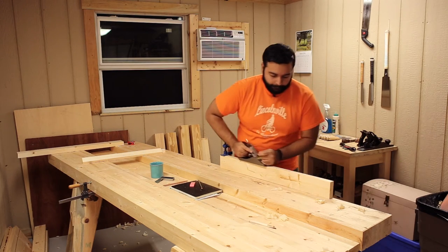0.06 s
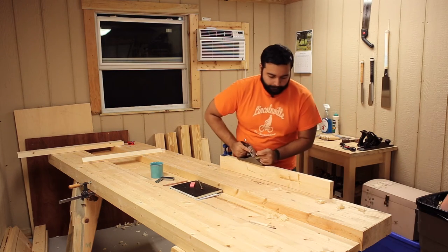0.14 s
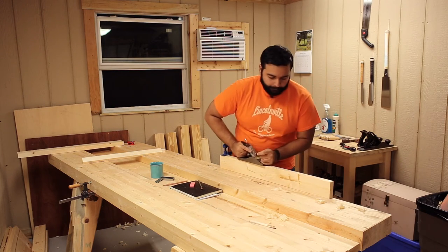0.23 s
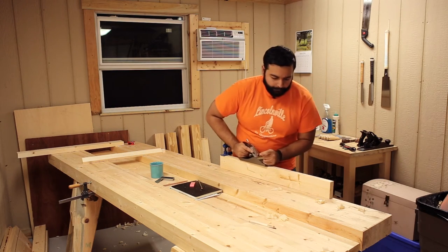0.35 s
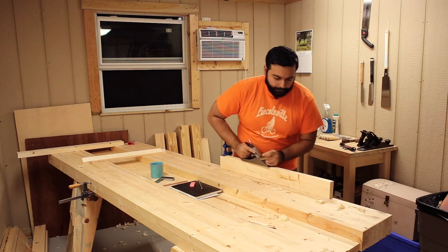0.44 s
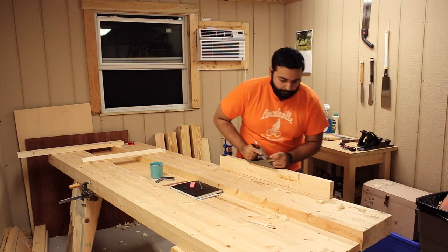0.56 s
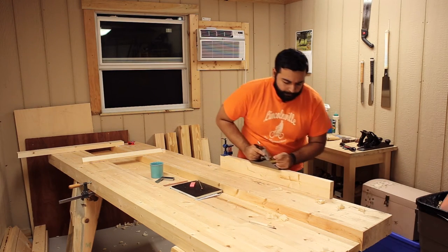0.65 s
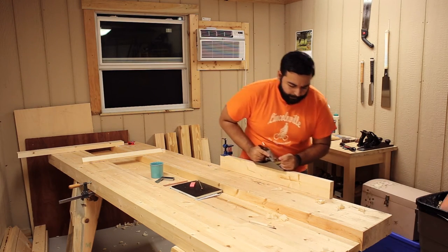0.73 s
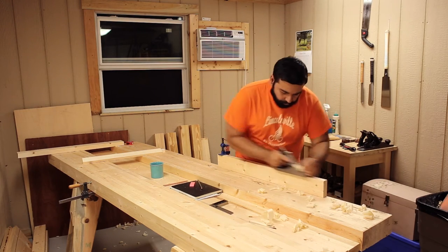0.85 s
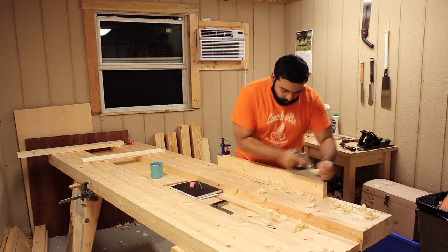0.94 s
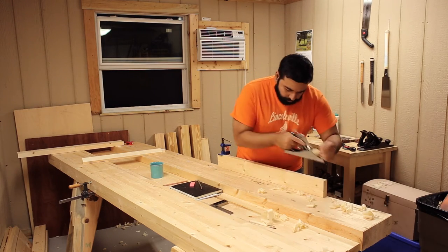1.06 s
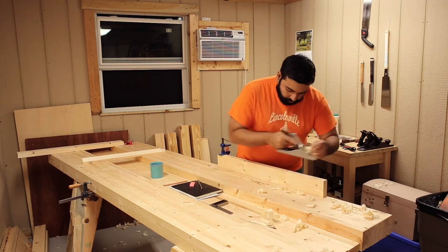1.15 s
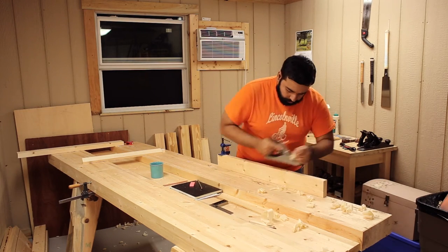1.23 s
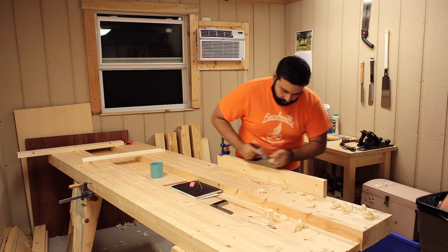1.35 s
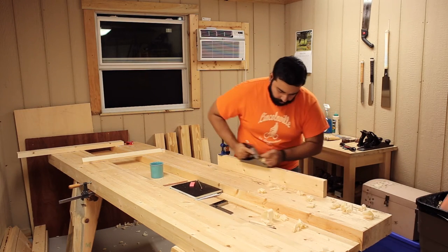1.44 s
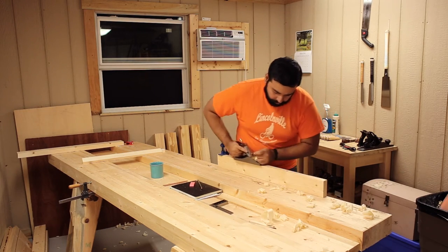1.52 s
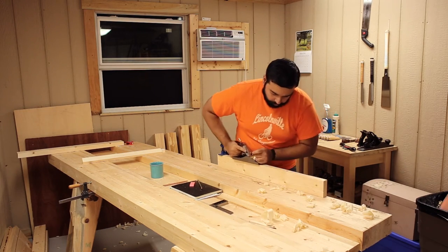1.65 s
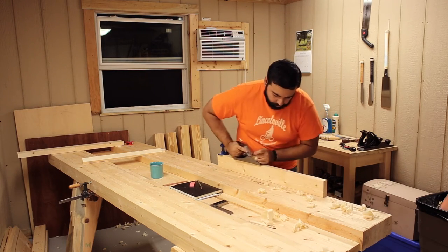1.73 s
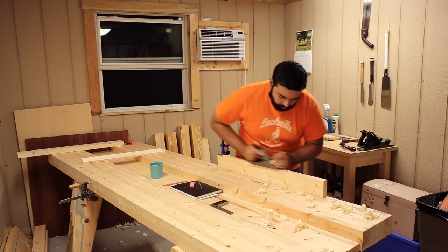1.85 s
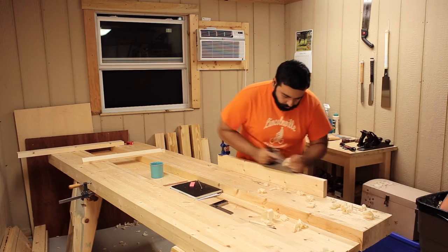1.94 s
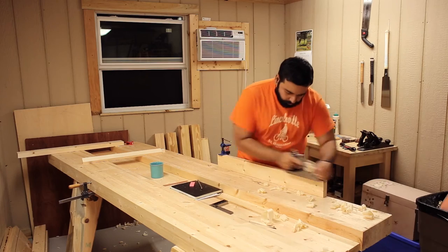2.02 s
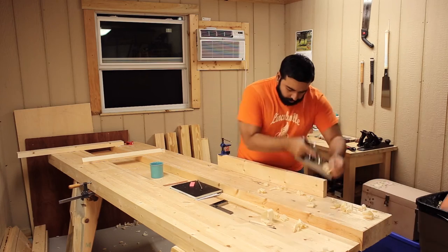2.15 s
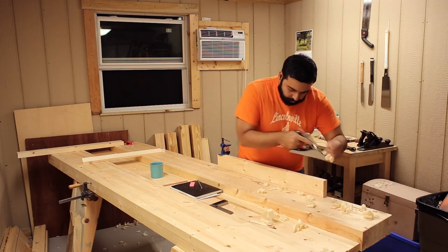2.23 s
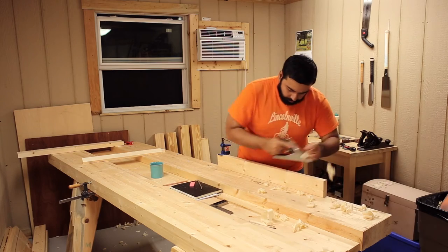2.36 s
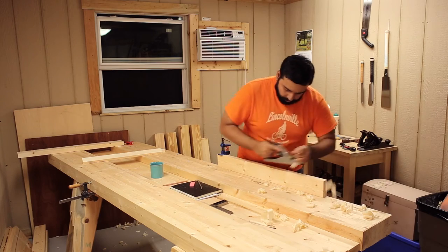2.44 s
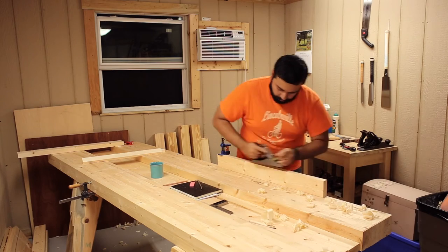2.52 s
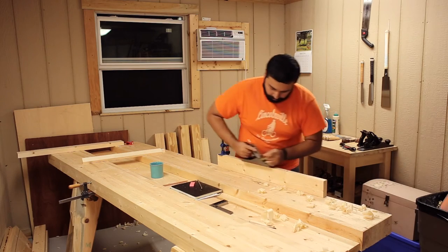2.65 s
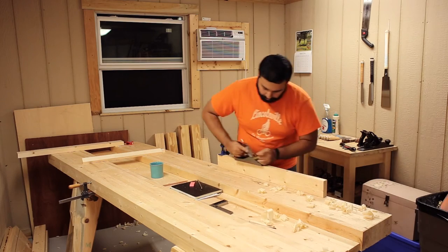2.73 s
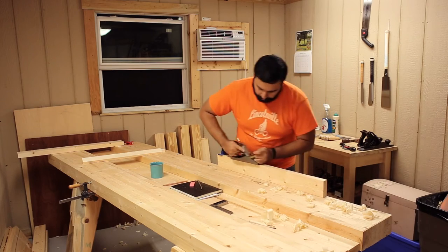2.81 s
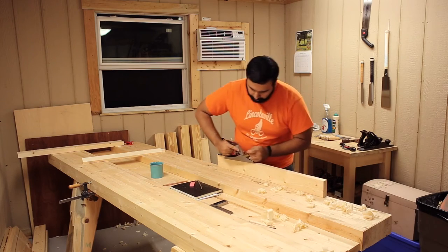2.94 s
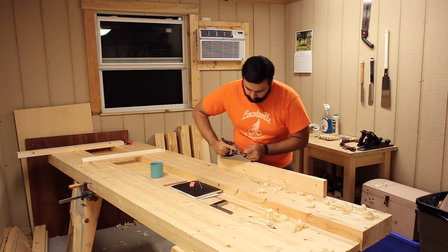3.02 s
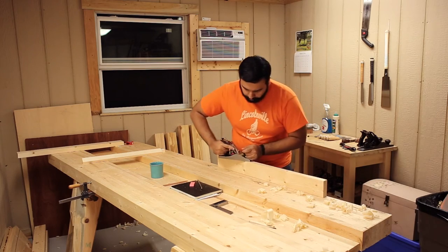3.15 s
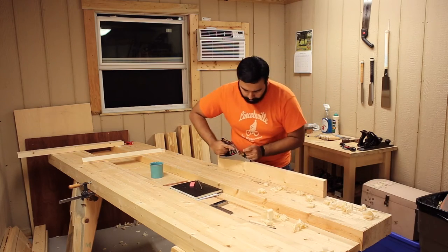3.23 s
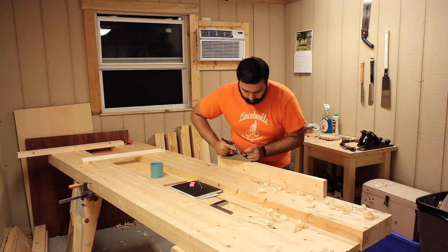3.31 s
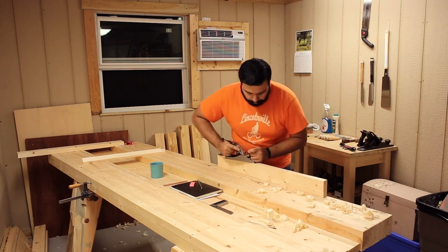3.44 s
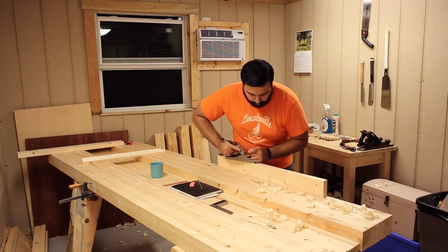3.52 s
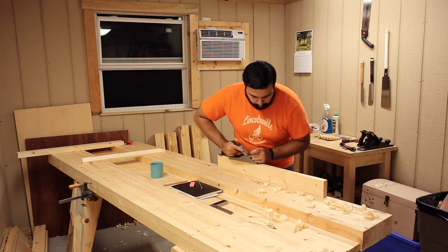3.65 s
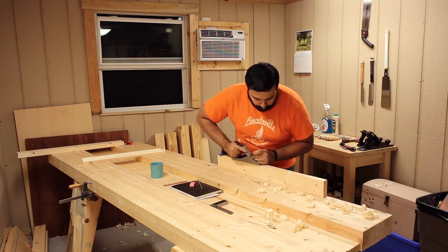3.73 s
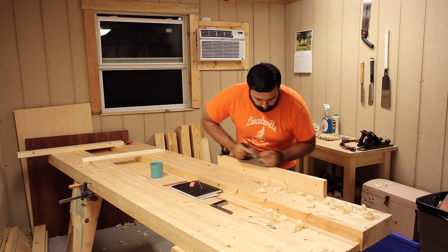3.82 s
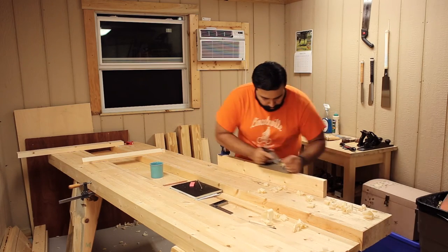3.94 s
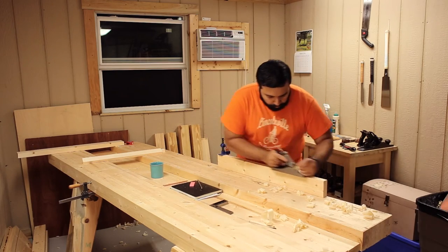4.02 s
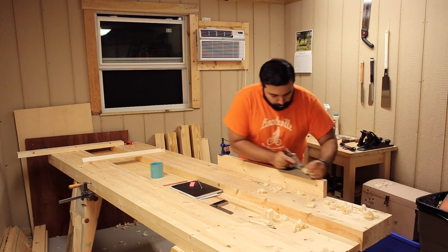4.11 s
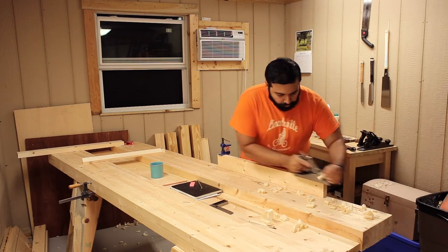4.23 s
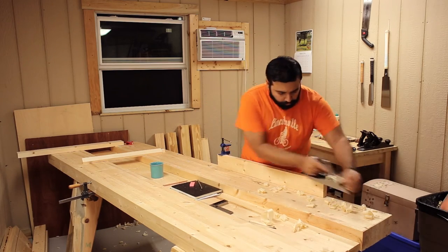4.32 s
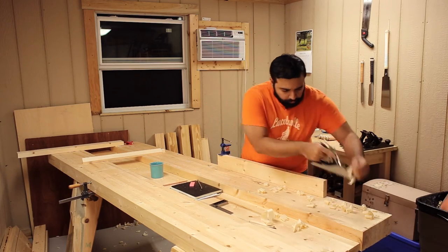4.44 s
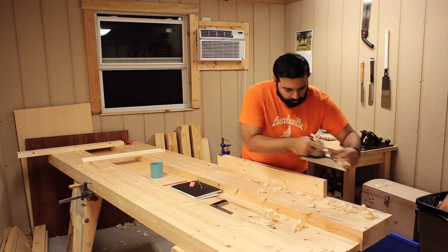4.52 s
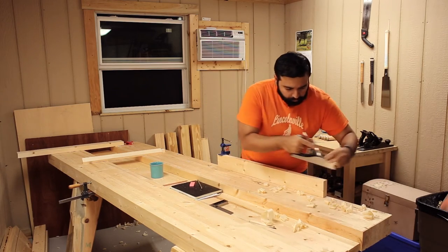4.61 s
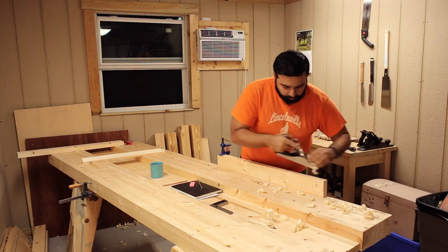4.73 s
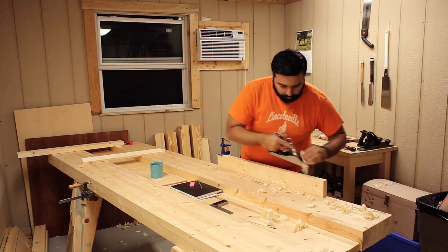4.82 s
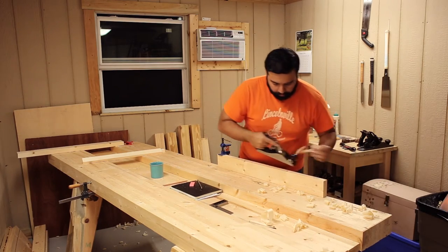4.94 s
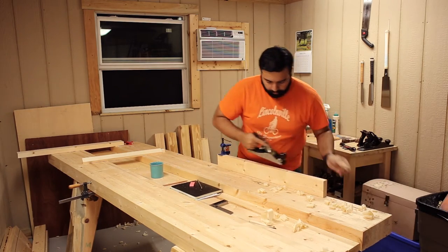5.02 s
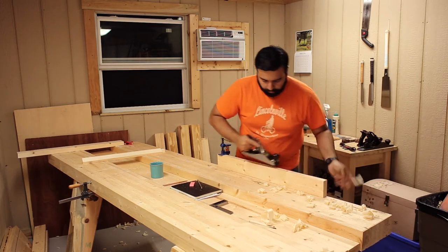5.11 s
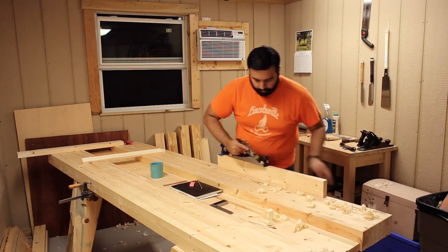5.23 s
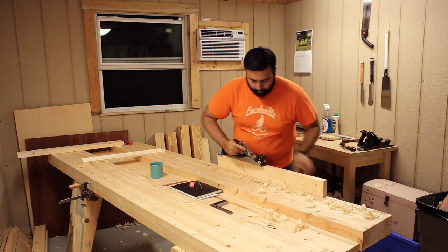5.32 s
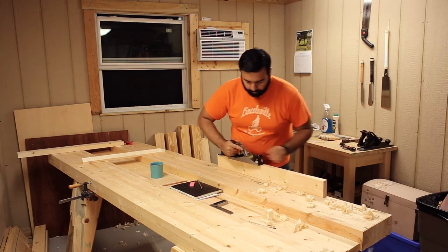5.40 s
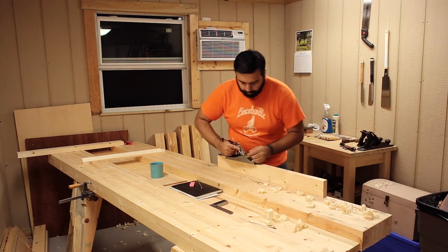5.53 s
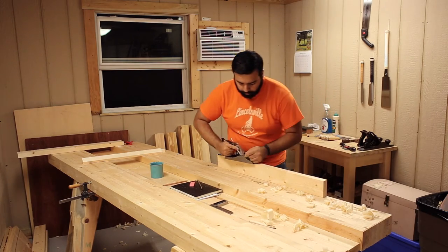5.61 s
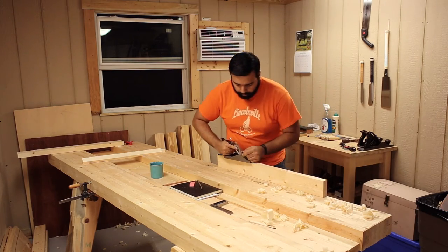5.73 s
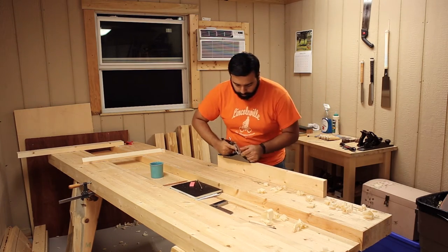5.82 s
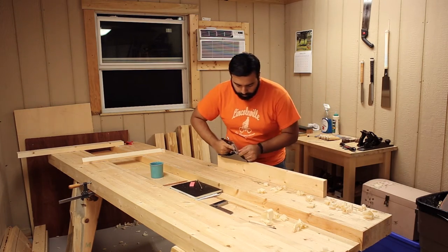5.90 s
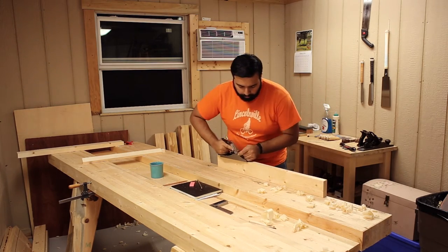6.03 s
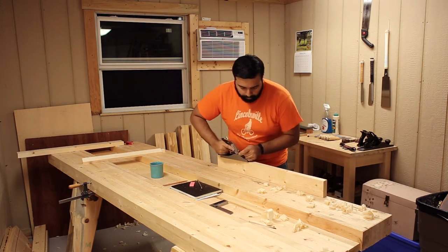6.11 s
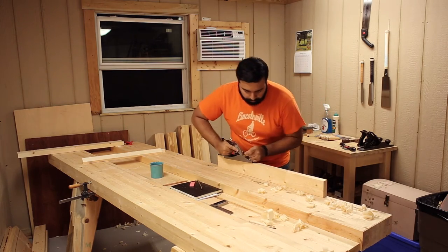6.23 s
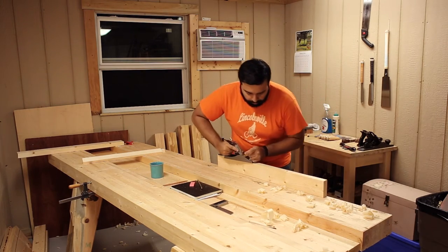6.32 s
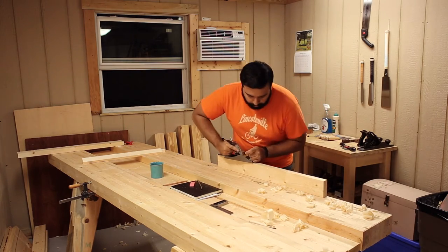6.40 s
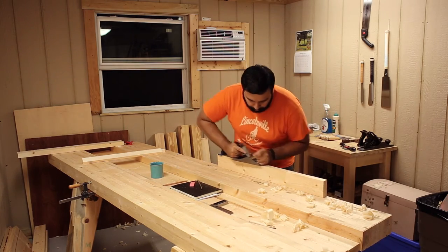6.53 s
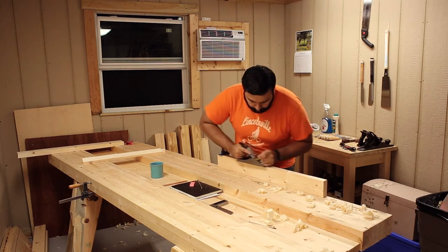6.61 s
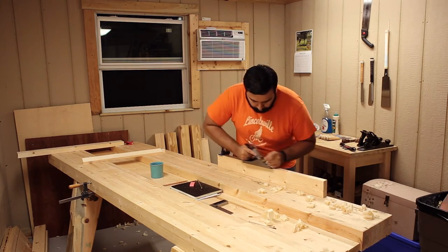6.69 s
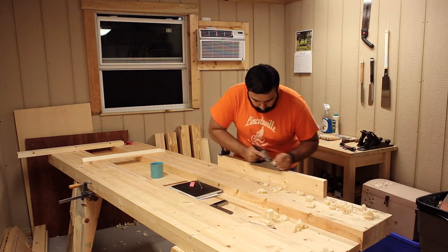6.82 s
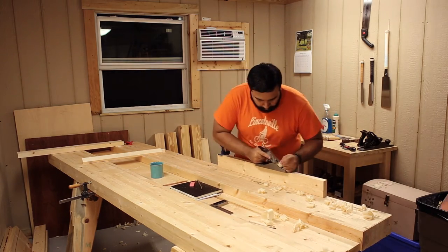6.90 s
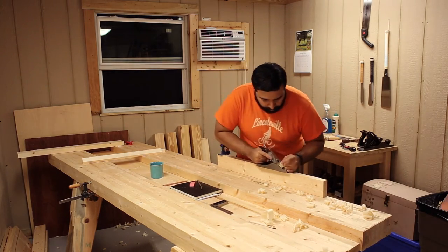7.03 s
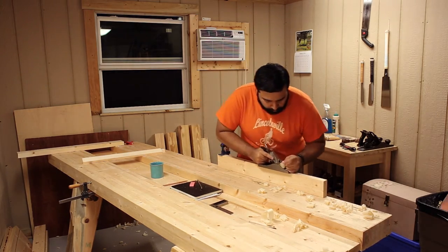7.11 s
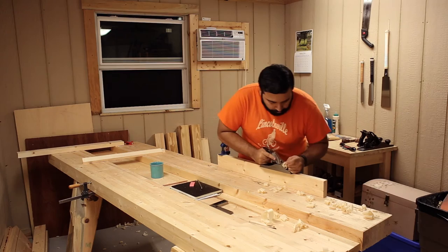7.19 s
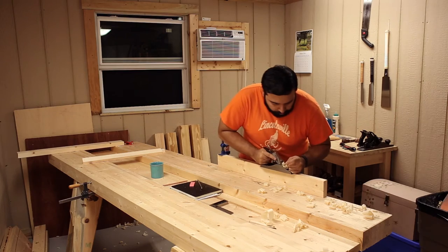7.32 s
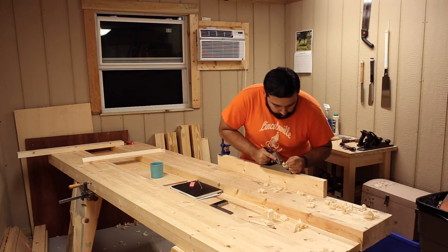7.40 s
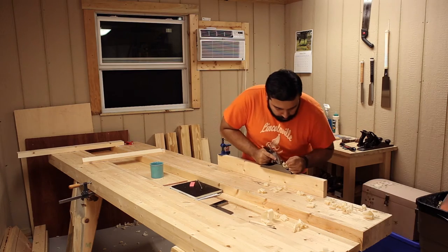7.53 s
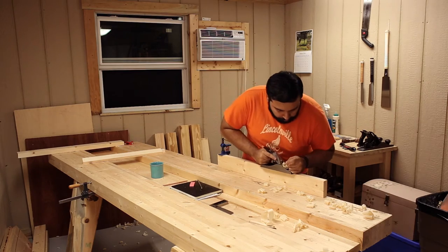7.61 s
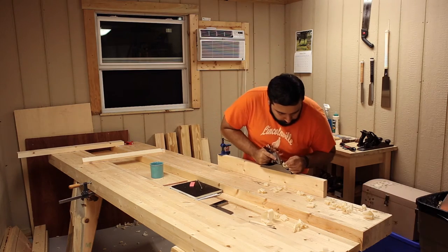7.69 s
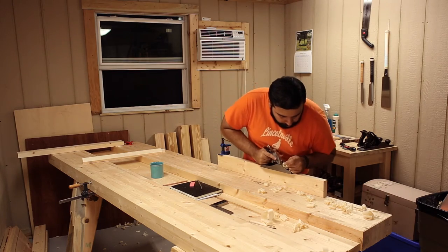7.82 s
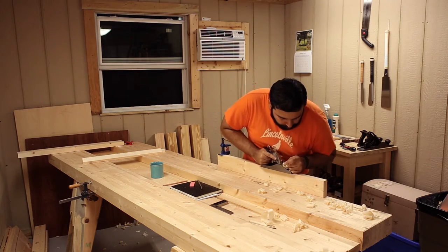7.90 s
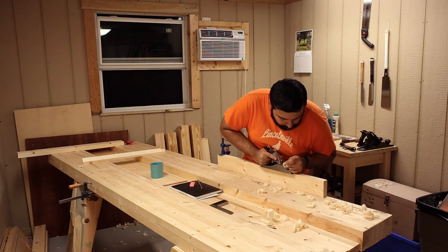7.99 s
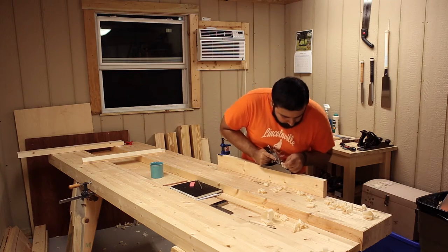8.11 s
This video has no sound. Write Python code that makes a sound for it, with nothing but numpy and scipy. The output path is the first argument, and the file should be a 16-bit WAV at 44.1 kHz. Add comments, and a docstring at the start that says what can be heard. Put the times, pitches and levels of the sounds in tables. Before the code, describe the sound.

Planing wood by hand, heard from a few metres in a lively small room. Four main strokes rasp and chatter around a hard middle pitch, with board drumming and crisp tearing shavings. Between them the plane's sole lands with sharp, dry wooden knocks, followed by soft rubbing, rustles and tiny ticks. The third stroke ends in a short sagging squeal; the last rings most strongly. Faint steady hiss and soft bass puffs of air lie beneath.

```python
"""In a small wooden workshop, a hand plane works the edge of a board a few metres from a two-port microphone.
Noise that stands for breaking fibres shakes the blade, which chatters on three notes, drums the board and
crackles in the curling shaving. Between strokes the sole knocks down on the wood, with rubbing and rustling.
Noise that dies away makes the room ring for about half a second over a faint hiss and a bass flutter of air."""
import sys
import numpy as np
from scipy import signal
from scipy.fft import rfft, irfft, next_fast_len
from scipy.io import wavfile
from scipy.ndimage import uniform_filter1d

SR = 44100
rng = np.random.default_rng(int(sys.argv[2]) if len(sys.argv) > 2 else 0)


def waveform_to_disk(signal):
    """Save audio, clipped to [-1, 1], as 16-bit WAV at the path in sys.argv[1]."""
    frames = np.transpose(np.atleast_2d(signal))
    scaled = np.clip(frames, -1, 1) * 32767
    samples = np.round(scaled).astype(np.int16)
    wavfile.write(sys.argv[1], SR, samples)


N = 359535
T = np.arange(N) / SR  # time in seconds

# The notes on which three parts ring. Each row: pitch in Hz, width in Hz, level in dB.
BLADE_MODES = [(1220.5, 62, 3.5), (1200, 500, -12.5), (1320, 88, -15.5)]
BOARD_MODES = [(321, 34, -4.5), (369.6, 17.5, 3), (426, 28, -1), (523, 54, 1.5), (603, 55, 1.5),
               (840, 300, -2.5)]
BENCH_MODES = [(112, 24, -7), (146, 26, 1), (205, 55, -5), (255, 50, -2)]


def undb(db):
    """Turns dB into gain."""
    return 10 ** (np.asarray(db) / 20)


def unit(x):
    """Scales a sound to an average (rms) level of 1."""
    return x / np.sqrt(np.mean(x ** 2))


def on_log(hz, table):
    """Reads a curve of (Hz, value) points on a logarithmic pitch axis, as the ear hears pitch."""
    at, value = np.transpose(table)
    return np.interp(np.log(hz + 1), np.log(at + 1), value)


def filtered(x, response):
    """Filters a sound by multiplying its spectrum by response(Hz)."""
    size = next_fast_len(x.shape[-1] + SR)
    hz = np.arange(size // 2 + 1) * SR / size
    return irfft(rfft(x, size) * response(hz), size)[..., :x.shape[-1]]


def resonance(hz, centre_hz, width_hz):
    """One damped mode, with gain 1 at its centre; a wider one dies away sooner."""
    return 1j * hz * width_hz / (centre_hz ** 2 - hz ** 2 + 1j * hz * width_hz)


def ringing(hz, modes):
    """Several modes of one object; neighbours in the list move in opposite phase."""
    return sum((-1) ** k * undb(db) * resonance(hz, centre_hz, width_hz)
               for k, (centre_hz, width_hz, db) in enumerate(modes))


def walk(rate):
    """A random wobble with a spread near 1: levels held for 1 / rate seconds, then smoothed twice."""
    k = int(SR / rate)
    steps = np.repeat(rng.standard_normal(N // k + 1), k)
    return 1.26 * uniform_filter1d(uniform_filter1d(steps, k), k)[:N]


def fibres(spread_db):
    """Dense breaks of fibre: noise in which a few breaks are much larger than the rest."""
    return rng.standard_normal(N) * undb(spread_db * rng.exponential(size=N))


def flexed(x, rate):
    """Changing hand pressure bends the resonances up and down, by playing the sound slightly early or late."""
    flex_s = .0007
    return np.interp(T + flex_s * walk(rate), T, x)


def held(start_s, length_s, attack_db_s, release_db_s):
    """A gain that climbs, holds at 1 and dies away; the slopes are in dB per second."""
    early_s = np.clip(start_s - T, 0, None)
    late_s = np.clip(T - start_s - length_s, 0, None)
    return undb(-attack_db_s * early_s - release_db_s * late_s)


def swells(rows):
    """A gain of smooth humps; each row gives centre in seconds, level in dB, half width in seconds."""
    return sum(undb(db) * np.exp(-((T - s) / width_s) ** 2) for s, db, width_s in rows)


def joined(spans, silent_db=-95):
    """Joins curves into full-length columns; in a long gap the first column, the level, fades out."""
    rows = []
    for span in sorted(spans):
        if rows and span[0][0] - rows[-1][0] > .25:
            rows += [(rows[-1][0] + 0.049, silent_db, *rows[-1][2:]),
                     (span[0][0] - .09, silent_db, *span[0][2:])]
        rows += span
    rows += [(rows[-1][0] + 0.088, silent_db, *rows[-1][2:])]
    s, *columns = np.transpose(sorted(rows, key=lambda row: row[0]))
    return [np.interp(T, s, column) for column in columns]


def hiss():
    """The faint, nearly steady floor: coloured noise, with separate middle and side (left-right) parts."""
    # Colour of the hiss. Each row: pitch in Hz, level in dB per Hz.
    hiss_colour = [(35, -34.5), (60, -18.5), (81, -4.5), (420, -7.5), (519, -7), (2380, -13.5),
                   (4700, -13.5), (5170, -16.5), (6530, -21), (14500, -29), (16300, -55)]
    level_db, side_db = -60, -4.5  # the second is relative to the first
    mid, side = filtered(rng.standard_normal((2, N)), lambda hz: undb(on_log(hz, hiss_colour)))
    mid = unit(mid) * undb(level_db + 1.3 * walk(0.6))
    side = unit(side) * undb(level_db + side_db)
    return np.array([mid + side, mid - side])


def air():
    """Slow air flutters on the ports as low noise, which pushes them mostly in opposite directions."""
    # Gusts of air on the ports. Each row: start in seconds, level in dB before the split between ports.
    gust_rows = [(0.0, -58), (1.031, -32), (2.181, -35.5), (2.57, -43), (3.88, -36.5), (4.4, -34),
                 (4.97, -43.5), (5.3, -58), (6.4, -49), (6.661, -45.5), (7.301, -54)]
    rise_db_s, fall_db_s, calm_db = 89, 63, -56
    flutter_hz, flutter_side_db = 34.6, 6.5
    puff_s, puff_db, puff_width_s = 1.032, -3, 0.0063  # one push of air as the first stroke dies away

    def flutter(hz):
        return hz / (hz + 8) * (1 / (1 + (hz / flutter_hz) ** 2.6) + 0.095 / (1 + (hz / 300) ** 3))

    flow = filtered(rng.standard_normal((2, N)) * undb(3.5 * walk(9.6)), flutter)
    strength = undb(calm_db) + sum(undb(db) * held(s, 0, rise_db_s, fall_db_s) for s, db in gust_rows)
    push, own = unit(flow) * strength
    u = (T - puff_s) / puff_width_s
    push = push + undb(puff_db) * u * np.exp(-u ** 2 / 2)
    mid = 0.45 * push + 0.82 * own
    side = undb(flutter_side_db) * push + .3 * own
    return np.array([mid - side, mid + side])


def plane():
    """The edge grabs and lets go unevenly; the same grip drives blade, sole, board, iron and shaving."""
    # Strokes, each a list of rows. Each row: time in seconds, sole scraping in dB,
    # blade chatter in dB over the scraping, shaving hiss in dB over the scraping.
    strokes = [
        [(0.385, -57, 0, 1.5), (0.445, -40.5, 2.5, -20.5), (0.53, -31, -1, -23.5), (0.584, -25, 3.5, -18.5),
         (0.64, -28, -5, -10), (0.73, -26, -2.5, -20), (0.81, -23.5, -2.5, -22.5), (0.844, -39.5, -14.5, 14),
         (0.886, -16.5, -7, -2), (0.928, -28.5, -1.5, -5.5), (0.962, -28, 1.5, 6), (1.012, -33, -16, -10.5),
         (1.1, -51.5, -22, -7)],
        [(1.78, -53.5, 4, -13.5), (1.84, -41.5, 2, -5.5), (1.876, -33.5, -3, 0.5), (1.892, -33, 6.5, -11),
         (1.934, -46.5, -2, 11), (1.968, -23.5, -12.5, -1), (1.994, -26, -13, 10), (2.016, -18.5, 0.5, -18.5),
         (2.034, -31, -5.5, 12), (2.184, -45, -18.5, -18), (2.2, -54, -13, -3)],
        [(3.58, -64, -7, 9.5), (3.608, -37.5, -7, -11), (3.748, -37.5, 7.5, -4), (3.778, -50, 10, 10),
         (3.842, -26.5, -8, -17), (3.968, -38, 2, 13), (4.044, -23, -8.5, -15), (4.19, -30, -15, -6.5),
         (4.208, -21, 0.5, -23), (4.302, -27.5, -1.5, -8), (4.43, -38, -14, -19.5)],
        [(6.46, -53, 2, 1.5), (6.534, -28.5, -4, -12.5), (6.558, -37.5, 13.5, 6.5), (6.574, -26.5, -0.5, -7),
         (6.632, -29.5, 3.5, -1.5), (6.686, -26.5, -8, -9.5), (6.738, -22, -1, -12), (6.864, -36.5, -5.5, -1.5),
         (6.926, -29, -17, -24), (6.948, -38.5, 10.5, -7), (7.06, -54.5, 4.5, -12)],
        [(7.09, -59, 2, -10), (7.14, -43, 10.5, -15), (7.19, -40.5, 1, -21), (7.24, -42, 9, -2),
         (7.28, -45, -1, -7), (7.305, -37.5, 6, -20), (7.322, -54, 3, -5), (7.36, -62, -8, -8)],
    ]
    # Short or faint scrapes: the end of a stroke, brief pushes, the plane sliding lightly.
    # Each row: time of full level in seconds, rise, hold and fall in seconds,
    # sole scraping in dB, blade chatter in dB over the scraping, shaving hiss in dB over the scraping.
    scrape_rows = [(0.0, .03, 0.1, 0.26, -37, -4, -24), (3.447, 0.12, 0.0069, 0.041, -32, -2, -11.5),
                   (5.418, 0.13, 0.16, .05, -62.5, 5, -16.5), (5.886, .08, 0.088, 0.042, -53, 10.5, -13),
                   (6.287, 0.12, 0.019, 0.026, -32, 0.5, -6), (7.399, 0.034, .02, 0.11, -44.5, -6.5, -21)]
    # A thicker shaving hisses more and also drums the board, rings the iron and tears. Each law:
    # dB over a -30 dB scrape, dB per dB of scrape, dB per dB of hiss over the scrape.
    drum_law = (-5.5, 0.57, 0.26)
    ring_law = (-4, 1.16, 0.11)
    tear_law = (0, 0.98, 0.93)
    # How freely the board drums under the plane. Each row: time in seconds, change in dB.
    drumming = [(0, 10), (.18, 3.5), (.5, 7), (.62, -18), (.8, 1), (3.7, 0.5), (3.87, 11.5), (4.05, 1.5),
                (4.2, -12), (4.3, -1), (6.52, 1), (6.62, 5.5), (6.95, -4.5), (7.14, 8), (7.3, 9),
                (7.39, -8)]
    # The edge digs in (+) or slips (-) for a moment. Each row: time in seconds, change in dB.
    bites = [(1.834, 5.5), (1.859, 5.5), (1.936, 9), (2.049, 7.5), (2.075, -2.5), (2.093, 15), (3.723, 12),
             (3.747, 8.5), (3.827, 7), (3.891, 3.5), (3.945, 7), (4.035, 6), (4.12, 7), (4.314, 12),
             (6.703, 4)]
    # Short tearing crackles of the shaving, and faint rustles in the pauses.
    # Each row: time in seconds, level in dB, half width in seconds.
    crackles = [(0.958, -12.5, 0.0092), (2.06, -29.5, 0.06), (4.21, -32, 0.028), (4.303, -11.5, 0.016),
                (4.835, -51, 0.03), (5.107, -43.5, 0.024), (6.572, -37, 0.0069)]
    # The iron sings out for a moment. Each row: time in seconds, level in dB, half width in seconds.
    sings = [(1.956, -36, 0.025), (3.94, -21.5, 0.026), (6.29, -32.5, 0.0061), (6.855, -23.5, 0.061),
             (7.23, -40, 0.078)]
    # Notes of the sole and of the iron. Each row: pitch in Hz, width in Hz, level in dB.
    sole_modes = [(2327, 92, 4), (1430, 220, -17.5), (2450, 1000, -3), (924, 550, -6.5)]
    iron_modes = [(3617, 180, 8), (3100, 490, 4), (3700, 980, 0.5)]
    # Colour of the shaving's crackle. Each row: pitch in Hz, level in dB per Hz.
    shaving_colour = [(2350, -32), (4000, 1), (6140, -6.5), (6750, -16.5), (7290, -3), (7960, -9),
                      (9770, -6.5), (11300, -2.5), (12400, -14), (14400, -8.5), (16300, -24)]
    fade_db, bite_s = 30.5, 0.0092  # a short scrape starts and ends this far down; half width of a bite

    scrapes = []
    for s, rise_s, hold_s, fall_s, db, *over in scrape_rows:
        low_db, end_s = db - fade_db, s + hold_s
        scrapes.append([(s - rise_s, low_db, *over), (s, db, *over),
                        (end_s, db, *over), (end_s + fall_s, low_db, *over)])
    sole_db, chatter_db, shaving_db = joined([list(map(tuple, rows)) for rows in strokes] + scrapes)
    board_db, iron_db, tear_db = (db - 30 + per_scrape * (sole_db + 30) + per_hiss * shaving_db
                                  for db, per_scrape, per_hiss in (drum_law, ring_law, tear_law))
    board_db = board_db + np.interp(T, *np.transpose(drumming))
    bite_db = sum(db * np.exp(-((T - s) / bite_s) ** 2) for s, db in bites)

    grip = walk(45) * 1.1 + walk(140) * 2.0  # in dB
    chatter = filtered(fibres(0.74) * undb(grip), lambda hz: ringing(hz, BLADE_MODES))
    scrape = filtered(fibres(1.7) * undb(.9 * grip + 1.1 * walk(25)), lambda hz: ringing(hz, sole_modes))
    ring = filtered(fibres(3.37) * undb(0.26 * grip + 1.0 * walk(35)), lambda hz: ringing(hz, iron_modes))
    chatter, scrape, ring = flexed(chatter, 7.), flexed(scrape, 14.), flexed(ring, 16.)
    lumps_db = 2.2 * walk(18)
    drum = filtered(fibres(3.31) * undb(0.36 * grip + lumps_db),
                    lambda hz: ringing(hz, BOARD_MODES) + 0.78 * ringing(hz, BENCH_MODES))
    curl = filtered(fibres(1.6) * undb(0.9 * grip + 0.36 * walk(26)),
                    lambda hz: undb(on_log(hz, shaving_colour)))
    tear = filtered(curl, lambda hz: 1 / (1 + (hz / 6500) ** 12))  # the lower part of the crackle
    parts = ((chatter, sole_db + chatter_db), (drum, board_db), (scrape, sole_db), (ring, iron_db),
             (tear, tear_db), (curl - tear, sole_db + shaving_db))
    cutting = undb(bite_db) * sum(unit(part) * undb(db) for part, db in parts)
    return cutting + swells(crackles) * unit(tear) + swells(sings) * unit(ring)


def locks():
    """Blade, sole, iron and board lock into rough tones whose phase wanders, each swelling and fading."""
    # Each row: centre in seconds, rms level in dB, half width in seconds, pitch in Hz, line width in Hz.
    lock_rows = [(.045, -37.5, 0.056, 409, 39.6), (6.814, -23.5, 0.019, 3520, 153),
                 (6.868, -25.5, .025, 3555, 198), (0.561, -30.5, 0.031, 1200, 79),
                 (0.591, -25, 0.019, 2330, 99), (1.835, -31, 0.018, 834, 120.4),
                 (1.875, -31.5, 0.02, 2364, 100), (1.89, -30.5, 0.011, 957, 150),
                 (3.893, -21, .014, 1220, 49.6), (6.585, -21.5, 0.016, 2230, 59.2),
                 (6.605, -15.5, 0.0076, 1255, 39.5), (6.632, -12.5, 0.016, 1217, 29.7),
                 (6.63, -25, 0.033, 2237, 60.4), (6.663, -16, 0.0068, 1250, 40),
                 (6.703, -12.5, 0.0052, 1183, 30), (6.735, -13.5, 0.018, 1206, 29),
                 (6.74, -23.5, .035, 2298, 60.4), (6.778, -21, 0.02, 1227, 49.5),
                 (6.795, -25, 0.02, 2216, 60), (6.92, -26.5, .02, 2342, 80.4),
                 (6.938, -26.5, 0.018, 1307, 60.6), (3.745, -24.5, 0.013, 2237, 80),
                 (4.04, -19.5, 0.01, 2350, 81), (7.168, -31.5, 0.017, 1230, 39.4),
                 (7.195, -27, 0.014, 1234, 40), (7.225, -25.5, 0.016, 1247, 39.8),
                 (7.3, -33.5, 0.0053, 3400, 149)]
    out = np.zeros(N)
    for s, db, width_s, hz, line_hz in lock_rows:
        near = np.abs(T - s) < 3 * width_s
        t = T[near] - s
        wander = np.cumsum(rng.standard_normal(len(t))) * np.sqrt(2 * np.pi * line_hz / SR)
        tone = np.sqrt(2) * np.cos(2 * np.pi * hz * t + wander)
        out[near] += undb(db) * np.exp(-(t / width_s) ** 2) * tone
    return out


def thump(t, rise_s=0.0019):
    """A dense woody thud with peak 1: noise coloured by the wood that swells and dies quickly."""
    # Colour of board and bench top struck together. Each row: pitch in Hz, level in dB per Hz.
    body_colour = [(140, -13), (260, -2.5), (400, -1.5), (540, 5), (650, -5.5), (790, -4), (900, -15),
                   (1150, -7.5), (4000, -41)]
    fade_s = 0.026
    x = filtered(rng.standard_normal(len(t)), lambda hz: undb(on_log(hz, body_colour)))
    x = x * (1 - np.exp(-(t / rise_s) ** 2)) * np.exp(-t / fade_s)
    return x / np.abs(x).max()


def knocks():
    """Each landing is a short rattle of contacts: a crack, a bloom of the board, a thud of the bench."""
    # The sole set down. Each row: start in seconds, peak of the crack in dB, then bench thud, board bloom
    # and edge click in dB over that peak, rattle in seconds (0.007 at least is used),
    # delay of the heel in seconds, level of the heel in dB over the first contact.
    knock_rows = [(0.169, -15.5, -36, -9, 1, 0.027, 0.013, -13),
                  (1.525, -4, -19, -5.5, -13.5, 0.0099, 0.0076, -11.5),
                  (2.761, -6, -16, -6.5, -2, 0.0024, 0.0075, -26),
                  (3.002, -34.5, 8.5, 13, -19, 0.0093, 0.009, -3),
                  (5.239, -8.5, -9, -5, -7.5, 0.015, 0.008, -21),
                  (5.693, -10.5, -9, -1.5, -17.5, 0.018, 0.0093, -27),
                  (6.025, -2.5, -24, -13.5, 1.5, 0.0093, 0.013, -34)]
    # Soft bumps of hand or plane on the bench. Each row: start in seconds, peak in dB.
    bump_rows = [(2.193, -45), (2.329, -46), (4.486, -39), (4.62, -40), (4.748, -44), (4.87, -45),
                 (5.579, -44)]
    # Colour of the crack. Each row: pitch in Hz, level in dB per Hz.
    crack_colour = [(410, -45), (700, -7.5), (824, -16.5), (1110, -1), (1660, -8), (2110, -9.5),
                    (3530, -16), (4950, -6.5), (14000, -71.5)]
    top_hz = 4250  # wood on wood is dull above this
    out, t = np.zeros(N), np.arange(int(.3 * SR)) / SR
    grid = np.linspace(0, SR / 2, 257)
    # The dB are doubled because minimum_phase halves them.
    colour = signal.firwin2(1023, grid, undb(2 * on_log(grid, crack_colour)), fs=SR)
    colour = signal.minimum_phase(colour)
    strike = undb(7) * np.exp(-((t - .0014) / .00007) ** 2)  # the first contact, one clean snap
    for s, db, bench_db, board_db, edge_db, rattle_s, heel_s, heel_db in knock_rows:
        touch = rng.standard_normal((2, len(t))) * (1 - np.exp(-(t / .0018) ** 2))
        rattle = touch[0] * np.exp(-t / max(rattle_s, .007))
        crack = signal.fftconvolve(strike + rattle, colour)[:len(t)]

        def heel_and_dulling(hz):
            heel = undb(heel_db) * np.exp(-2j * np.pi * hz * heel_s)
            return (1 + heel) / (1 + 1j * hz / top_hz) ** 4

        crack = filtered(crack, heel_and_dulling)
        edge = filtered(crack, lambda hz: resonance(hz, 3040, 2600) ** 2)
        bloom = thump(t)
        thud = filtered(touch[1] * np.exp(-t / 0.0051),
                        lambda hz: ringing(hz, BENCH_MODES) / (1 + 1j * hz / 1500) ** 2)
        parts = (crack, 0), (edge, edge_db), (bloom, board_db), (thud, bench_db)
        first = int(s * SR)
        out[first:first + len(t)] += sum(undb(db + over_db) * x / np.abs(x).max() for x, over_db in parts)
    for s, db in bump_rows:
        first = int(s * SR)
        out[first:first + len(t)] += undb(db) * thump(t, rise_s=0.013)
    return out


def handling():
    """Rubbing, rustling and swishing, made of patchy noise: a low rub under a rustle, a swish and a fizz."""
    # Rubbing, rustling and swishing of plane, hands and shavings, also the short rustle following a knock.
    # Each row: start in seconds, length in seconds, then low rub, middle rustle, swish and fine fizz in dB.
    brush_rows = [(0.193, 0.011, -59, -31.5, -35, -46), (0.234, 0.27, -67, -62, -78, -79),
                  (1.047, 0.16, -43.5, -53.5, -55, -54), (1.307, 0.36, -48.5, -57.5, -60.5, -60),
                  (2.155, 0.039, -50, -45.5, -42.5, -46), (2.38, 0.066, -56, -56.5, -69, -60.5),
                  (2.523, 0.56, -59, -57, -53, -55.5), (2.955, 0.21, -51, -50, -60.5, -64),
                  (3.333, 0.091, -69, -49.5, -54, -54), (4.403, 0.22, -41.5, -55.5, -56, -59),
                  (4.638, 0.099, -49, -63, -55.5, -54), (4.815, 0.011, -49, -52, -51.5, -48.5),
                  (4.95, 0.085, -53, -67, -69, -75), (5.089, 0.016, -50.5, -68, -58, -60.5),
                  (5.612, 0.19, -48.5, -53, -55.5, -61), (5.852, 0.2, -41.5, -55, -66, -63),
                  (6.05, 0.092, -76, -35, -43, -52.5), (7.448, 0.028, -71.5, -55, -65.5, -83),
                  (7.923, 0.073, -55.5, -62, -62, -62.5), (8.105, 0.064, -68, -52.5, -48, -53.5)]
    attack_db_s, release_db_s = 297, 130.5
    low, middle, high, top = sum(undb(db)[:, None] * held(s, length_s, attack_db_s, release_db_s)
                                 for s, length_s, *db in brush_rows)
    touch = 1.6 * walk(22)
    rub = filtered(fibres(4.66) * undb(touch + 1.9 * walk(43)),
                   lambda hz: ringing(hz, BOARD_MODES[:3]) + 1.0 * ringing(hz, BENCH_MODES)
                   + 0.38 * resonance(hz, 370, 150))
    rustle = filtered(fibres(1.9) * undb(2.2 * touch),
                      lambda hz: resonance(hz, 1600, 1500) ** 2 + 0.35 * ringing(hz, BLADE_MODES))
    brushing = fibres(1.4) * undb(0.75 * touch)
    swish = filtered(brushing, lambda hz: resonance(hz, 3800, 2200) ** 2)
    fizz = filtered(brushing, lambda hz: resonance(hz, 11500, 9600) ** 2)
    return unit(rub) * low + unit(rustle) * middle + unit(swish) * high + unit(fizz) * top


def ticks():
    """Snapping fibres and small touches: noise bursts of a few cycles around one pitch."""
    # Each row: start in seconds, peak in dB, pitch in Hz.
    tick_rows = [(0.8868, 2, 10800), (1.3774, -39, 2390), (1.49, -31, 3300), (2.0106, -3, 2170),
                 (3.304, -37, 2780), (3.5745, -24, 13500), (3.7798, -18, 13100), (3.813, -29, 2300),
                 (4.2944, -24, 5400), (4.318, -28, 3900), (4.592, -32, 3080), (4.819, -21, 4600),
                 (4.973, -36, 8400), (4.974, -38, 2500), (5.056, -42, 4500), (6.417, -39, 2580),
                 (7.245, -28, 4200), (7.6612, -40.5, 3560), (7.7892, -43, 2500), (7.8466, -41, 2660),
                 (7.936, -36, 3560), (8.088, -34, 3000)]
    out, t = np.zeros(N), np.arange(int(0.022 * SR)) / SR
    for s, db, hz in tick_rows:
        burst = rng.standard_normal(len(t)) * np.exp(-t / 0.0021)
        burst = filtered(burst, lambda f: resonance(f, hz, 0.5 * hz) ** 2)
        first = int(s * SR)
        out[first:first + len(t)] += undb(db) * burst / np.abs(burst).max()
    return out


def squeal(width_hz=170, upper_hz=2700, upper_db=-6):
    """The blade squeals as it leaves the wood: a rough, sagging ring under a steadier upper band."""
    # The blade catches twice. Each row: start in seconds, length in seconds, first pitch in Hz, level in dB.
    squeal_rows = [(4.206, 0.1, 1380, -17), (4.29, 0.043, 1238, -23)]
    sag_hz_s, edge_s = 2860, 0.00427  # fall of pitch in Hz per second; half the length of the fade-in
    hz = gain = 0
    for s, length_s, first_hz, db in squeal_rows:
        hz = np.where(T > s - edge_s, first_hz - sag_hz_s * (T - s), hz)
        fade_points_s = [-edge_s, edge_s, length_s, length_s + edge_s]
        gain = gain + undb(db) * np.interp(T - s, fade_points_s, [0, 1, 1, 0])
    phase, upper = 2 * np.pi * np.cumsum(hz) / SR, 2 * np.pi * upper_hz * T
    rough = filtered(rng.standard_normal((4, N)), lambda f: 1 / (1 + (2 * f / width_hz) ** 2))
    low = rough[0] * np.cos(phase) + rough[1] * np.sin(phase)
    high = rough[2] * np.cos(upper) + rough[3] * np.sin(upper)
    return unit(low + undb(upper_db) * high) * gain


def ports(hz):
    """The bench reaches the left port first; the right one catches more of its treble."""
    # Each row: pitch in Hz, radians by which the left port leads.
    lead_rows = [(0, 0), (1800, 0.5), (3900, 2), (4800, 3.5), (7000, 4.5), (9000, 4.5), (12500, 5.5),
                 (16000, 9.5)]
    treble_db = 2.5  # added on the right and taken off on the left around 8500 Hz
    side = np.array([[1], [-1]])
    lead = np.interp(hz, *np.transpose(lead_rows))
    return np.exp(.5j * lead * side) * undb(-side * treble_db * np.exp(-((hz - 8500) / 2500) ** 2))


def tail():
    """Echoes as octave bands of noise that each die at their own rate; middle and side are unrelated."""
    # Time to die by 60 dB. Each row: pitch in Hz, time in seconds.
    decay_times = [(100, 0.27), (500, 0.6), (1500, 0.48), (4000, 0.57), (9000, 0.063), (16000, 0.14)]
    # Strength of the echoes. Each row: pitch in Hz, echoes over direct sound in dB.
    wet_levels = [(100, -3.5), (500, -2), (1200, -10.5), (3000, -9), (7000, -22), (15000, -33.5)]
    # Width of the echoes. Each row: pitch in Hz, side over middle in dB.
    side_levels = [(60, 0), (150, -21), (400, -19.5), (900, -21), (2000, -13), (4500, -8.5), (9000, 21),
                   (15000, -6.5)]
    first_echo_s = 0.002
    # Tools and bench top throw the treble differently to each port.
    scatter_db, scatter_s, scatter_hz = -3, 0.0069, 2530
    t = np.arange(int(.9 * SR)) / SR
    echoes = 0
    for hz in 90 * 2. ** np.arange(8):
        band = filtered(rng.standard_normal((2, len(t))), lambda f: np.abs(resonance(f, hz, hz)) ** 2)
        t60 = on_log(hz, decay_times)
        fade = undb(on_log(hz, wet_levels) - 60 * t / t60)
        echoes = echoes + band * fade / np.sqrt(t60 * SR / np.log(10 ** 6))
    mid, side = echoes * np.clip(t / first_echo_s - 1, 0, 1)
    side = filtered(side, lambda f: undb(on_log(f, side_levels)))
    early = rng.standard_normal((2, len(t))) * np.exp(-t / scatter_s) / np.sqrt(scatter_s * SR / 2)
    early = filtered(early, lambda f: undb(scatter_db) / (1 + (scatter_hz / (f + 1)) ** 4))
    return np.array([mid + side, mid - side]) + early


def room(x, count=3, turn_s=.55):
    """The plane keeps moving, so the walls answer from one place after another: several tails take turns."""
    wet = 0
    for k in range(count):
        share = np.sqrt(2 / count) * np.cos(np.pi * (T / turn_s + k / count))
        wet = wet + signal.fftconvolve((share * x)[None], tail(), axes=1)[:, :N]
    return wet


def scene():
    """Adds direct sound, echoes, hiss and air."""
    knock_wet_db = 4  # a blow spreads through the whole bench, whose bass fills the room more
    cut = plane() + locks() + handling() + ticks() + squeal()
    blows = knocks()
    direct = filtered(np.array([cut + blows, cut + blows]), ports)
    spread = filtered(blows, lambda hz: undb(knock_wet_db / (1 + (hz / 2500) ** 2)))
    return direct + room(cut + spread) + hiss() + air()


def record(dry):
    """The microphone's electronics round the loudest peaks and cut the top of the treble."""
    top_hz = 15700
    rounded = dry / (1 + dry ** 6) ** (1 / 6)
    return signal.sosfilt(signal.ellip(10, .2, 95, top_hz, fs=SR, output="sos"), rounded)


dry = scene()
out = record(dry)
waveform_to_disk(out)
```